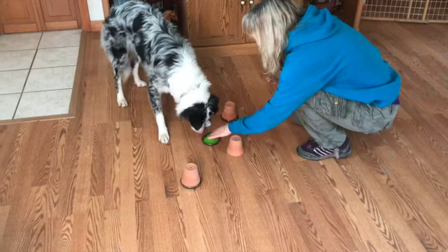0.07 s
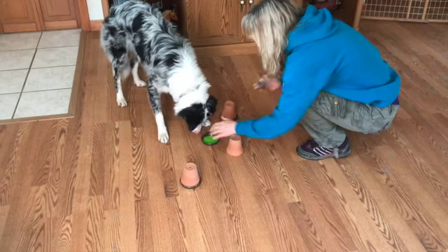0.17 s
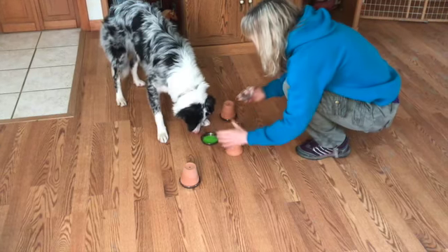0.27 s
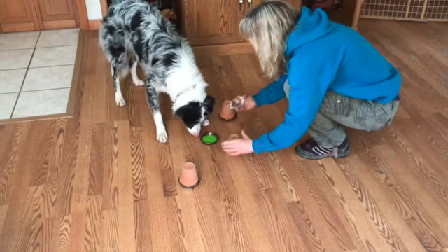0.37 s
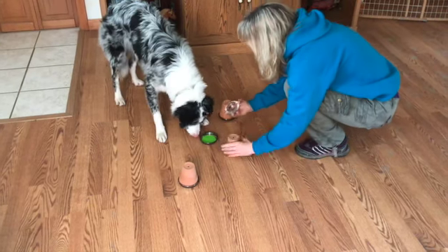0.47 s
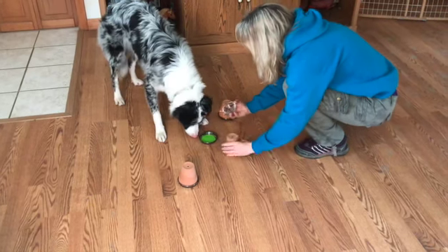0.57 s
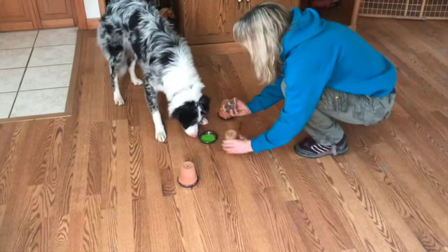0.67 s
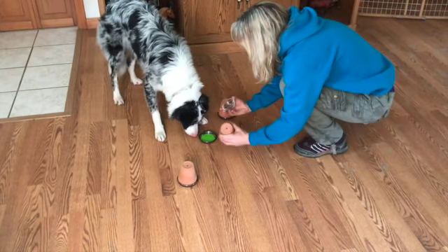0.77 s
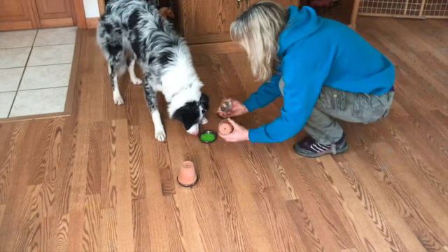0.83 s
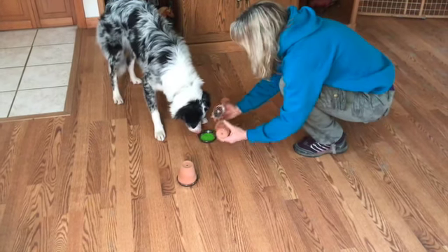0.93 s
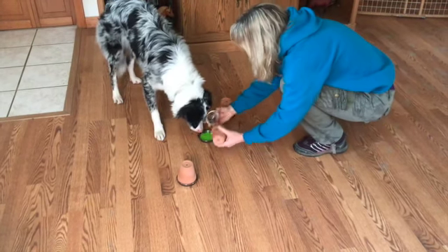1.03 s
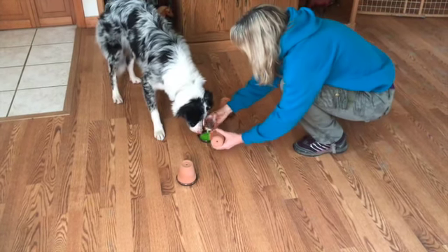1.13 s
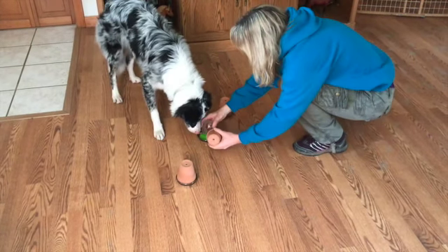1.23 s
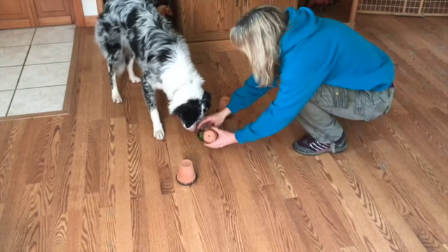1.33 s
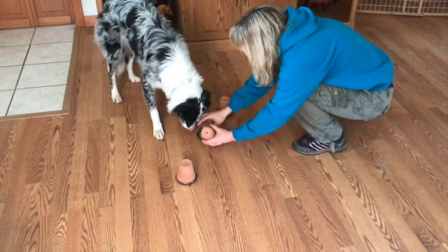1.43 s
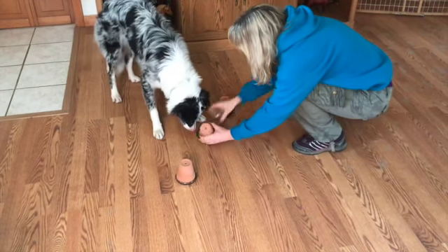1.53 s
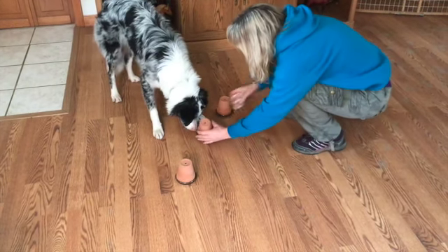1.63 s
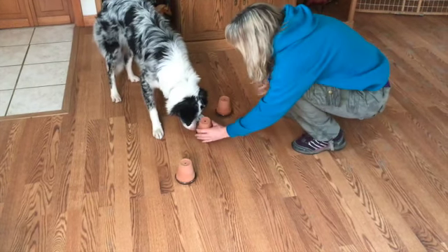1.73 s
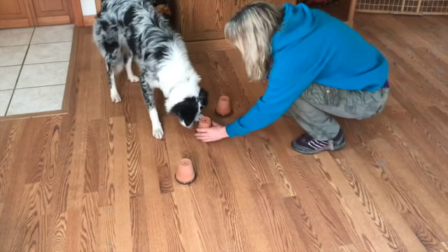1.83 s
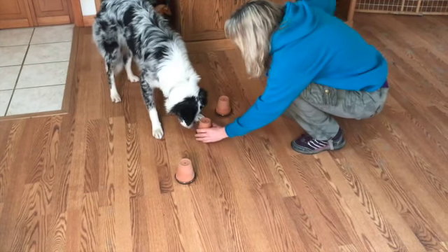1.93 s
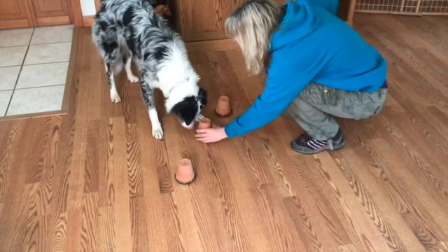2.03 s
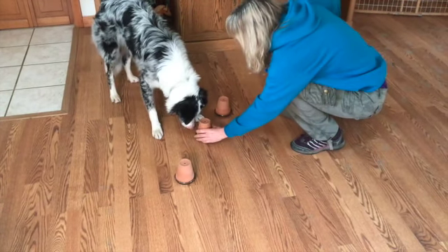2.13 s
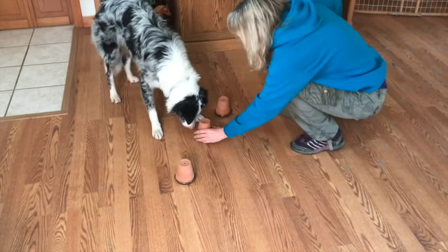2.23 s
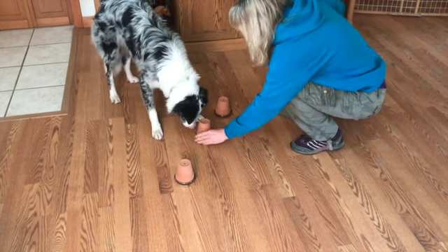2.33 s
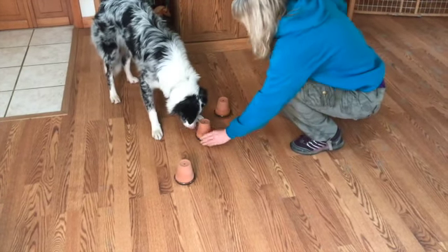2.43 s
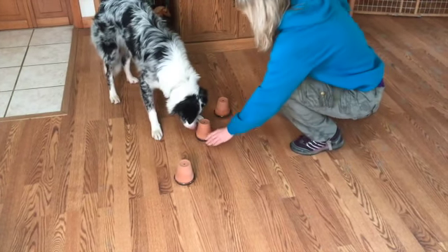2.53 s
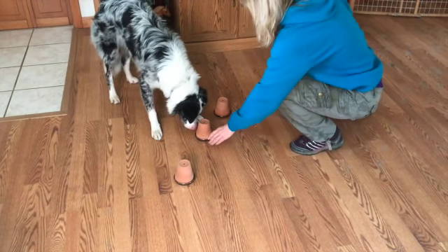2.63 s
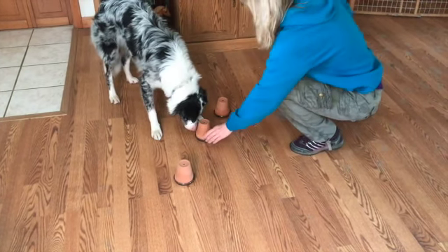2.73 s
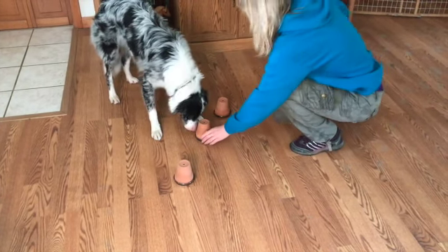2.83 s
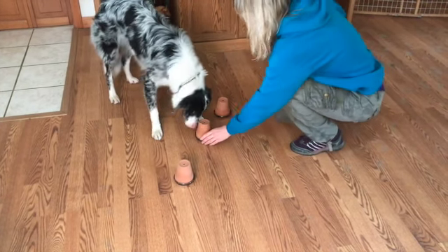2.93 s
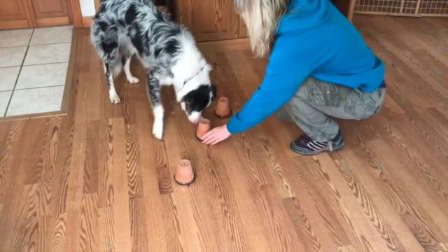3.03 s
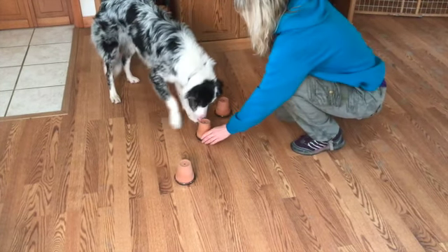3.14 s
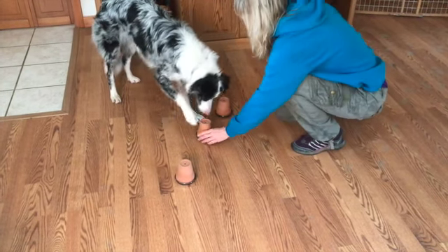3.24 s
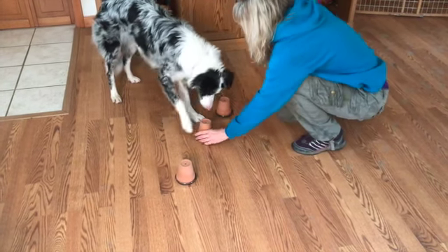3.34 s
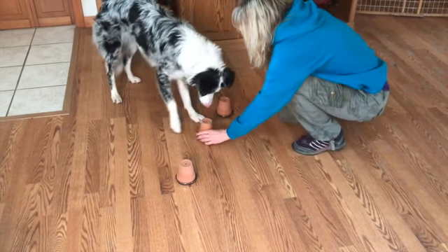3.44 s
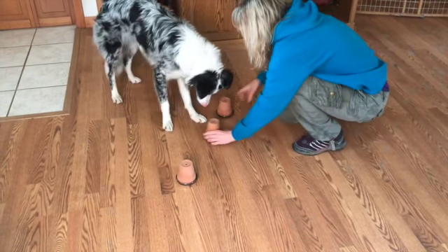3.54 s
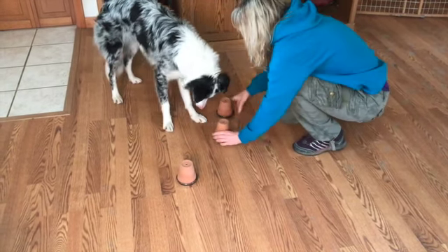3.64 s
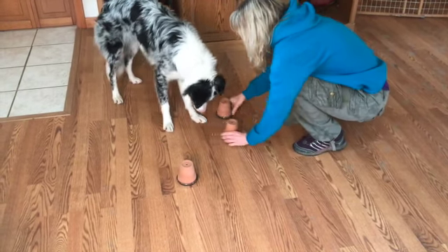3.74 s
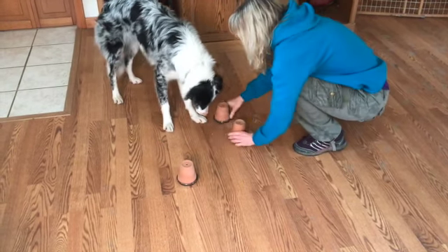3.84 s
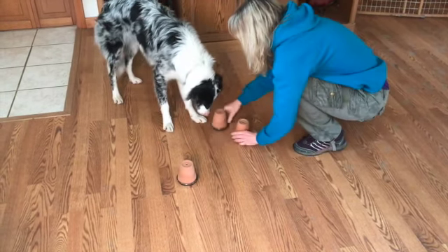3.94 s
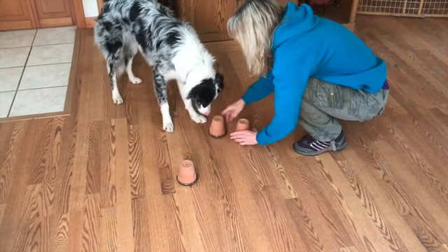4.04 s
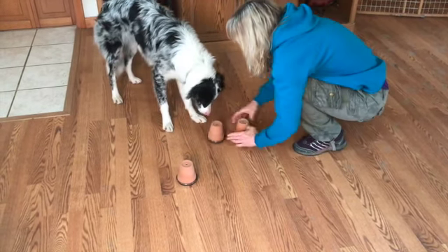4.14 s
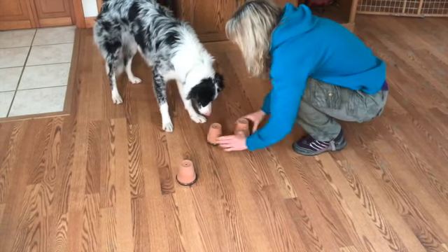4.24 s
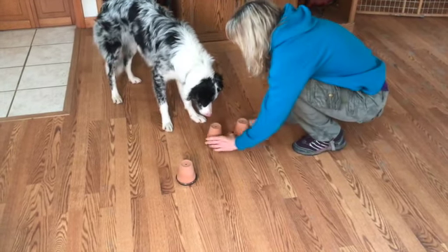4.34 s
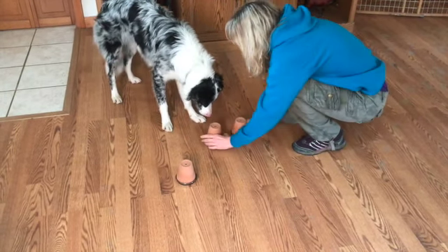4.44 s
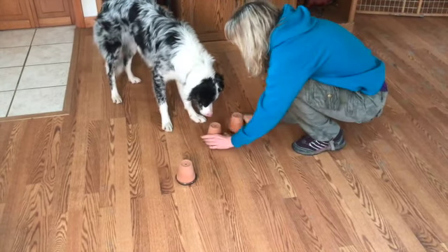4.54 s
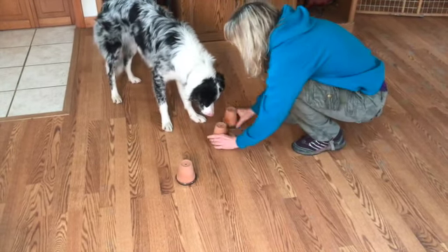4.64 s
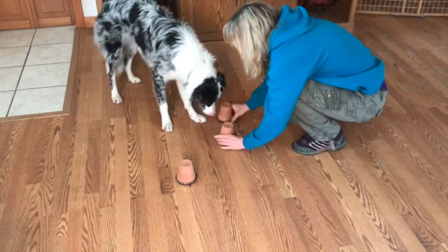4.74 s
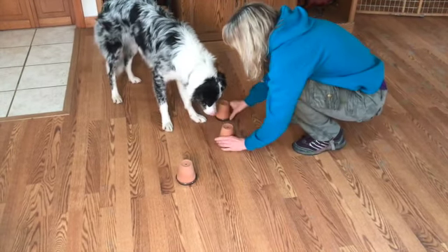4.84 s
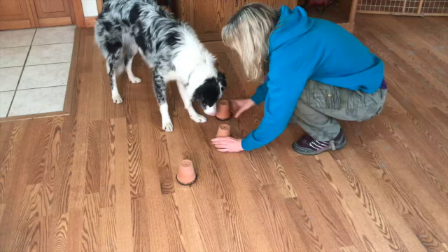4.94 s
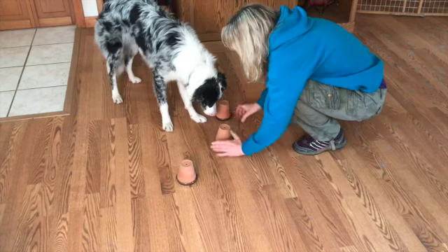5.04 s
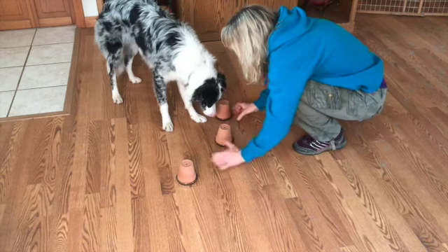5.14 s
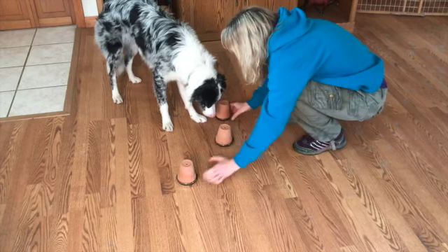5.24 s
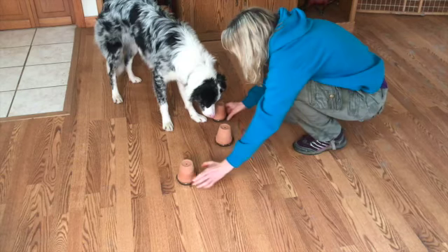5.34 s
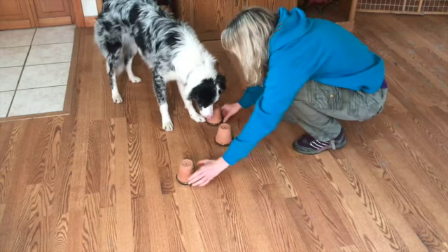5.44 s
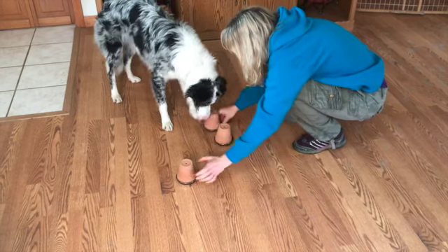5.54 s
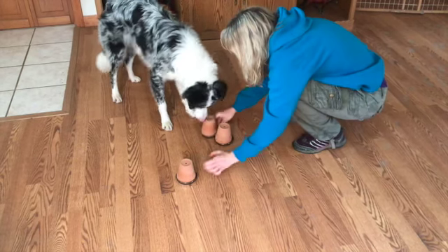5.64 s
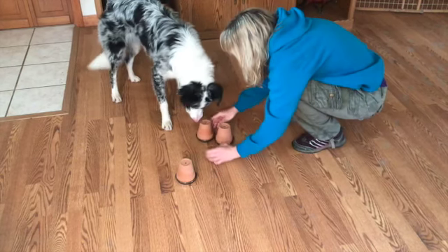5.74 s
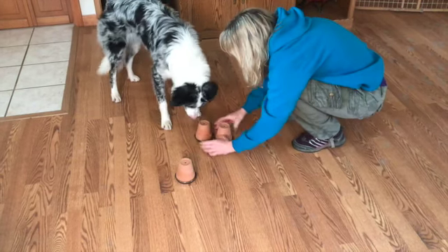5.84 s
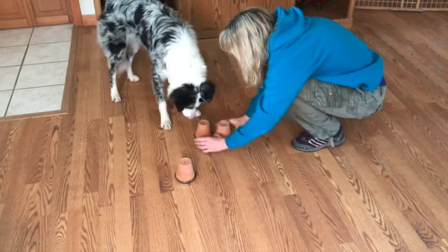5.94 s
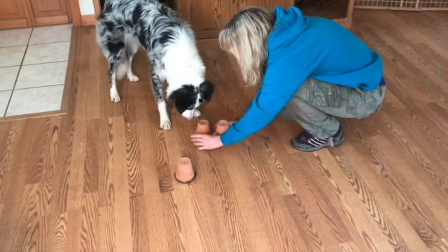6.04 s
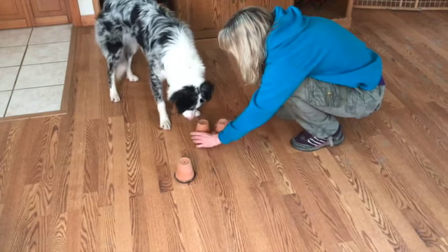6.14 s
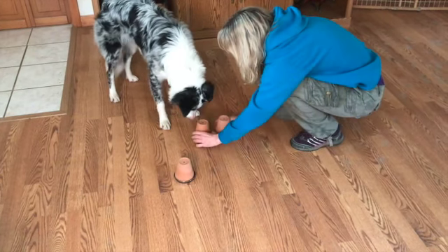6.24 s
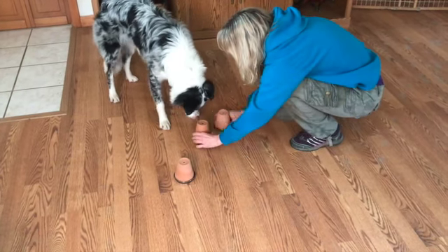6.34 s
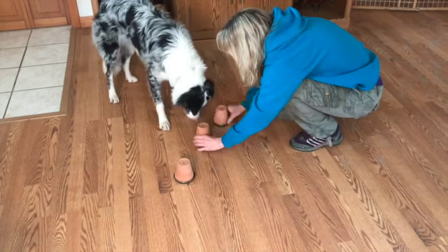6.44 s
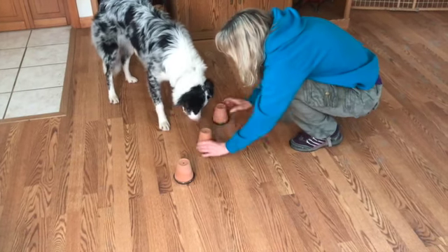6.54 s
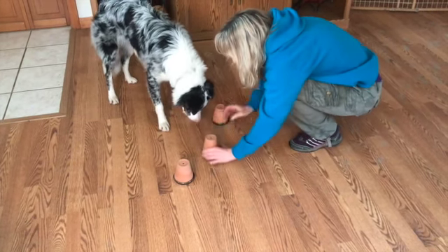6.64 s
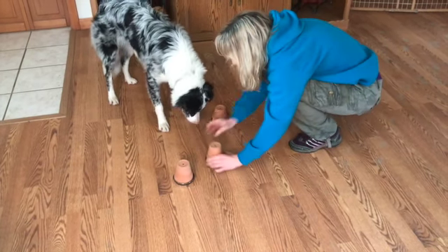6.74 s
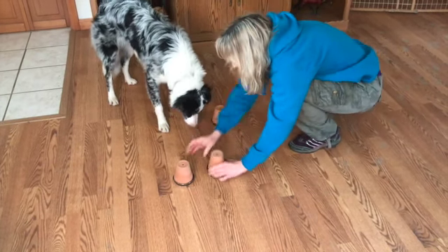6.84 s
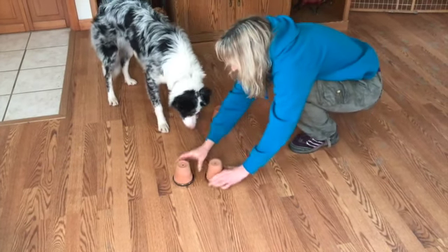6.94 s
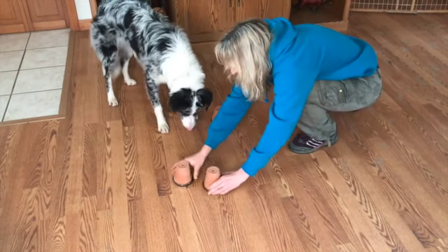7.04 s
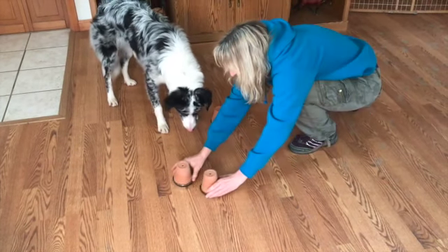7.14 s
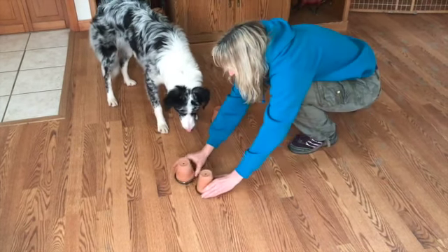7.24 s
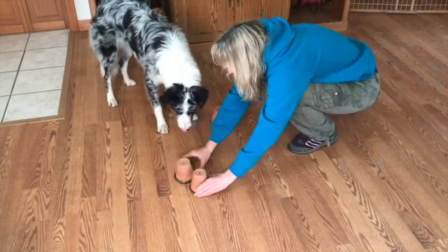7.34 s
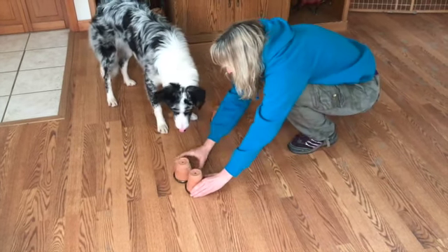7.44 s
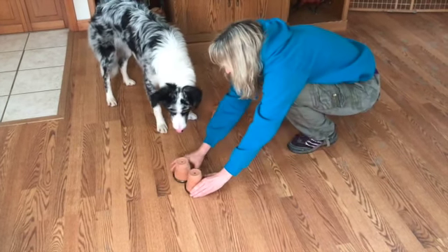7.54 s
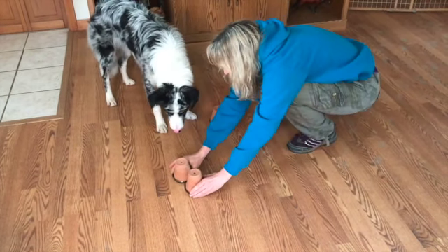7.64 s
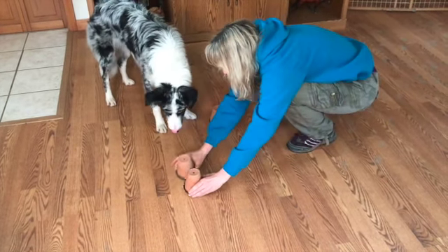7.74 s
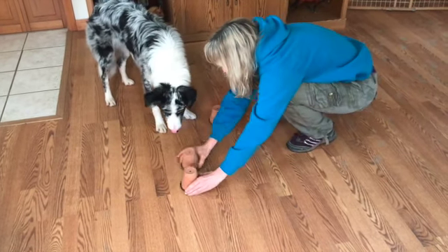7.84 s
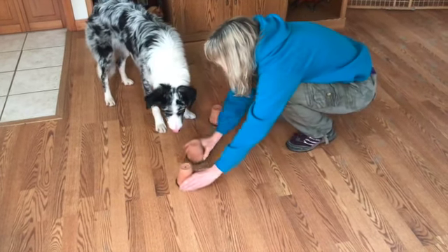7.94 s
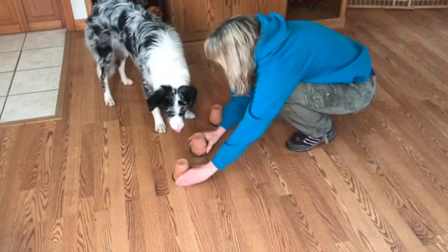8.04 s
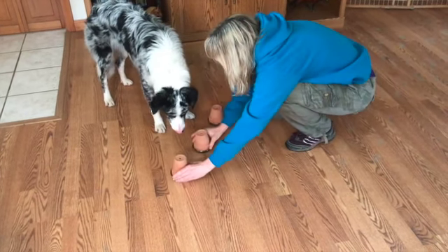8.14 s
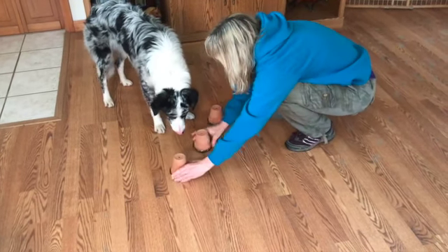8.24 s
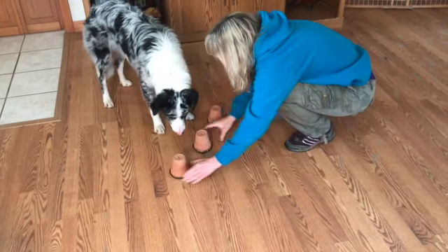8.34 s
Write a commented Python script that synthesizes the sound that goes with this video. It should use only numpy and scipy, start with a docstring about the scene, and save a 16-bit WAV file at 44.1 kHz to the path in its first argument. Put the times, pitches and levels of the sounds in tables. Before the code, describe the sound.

Quiet indoor air, a low blurred hum and a very thin high electrical whine continue throughout. Faint regular dry ticks run from 0.1 to 1.2 s, with scattered ones afterwards. Barely audible brushes and soft touches come at 0.6 and 1.2 s, then a firm, dull double knock of a clay pot on wooden boards near 2 s. After a lull, rough hollow scraping runs from 3.4 to 4.3 s, with a knock at 3.9, and another stroke from 4.4 to 5.0 with a knock at 4.7 and a soft, very low bump. A third scrape from 5.3 ends in a tight, ringing clatter at 5.7. A long gritty slide spans 6.1-7.2 s, with a small judder near 7. Hard clinking knocks at 7.4 and 7.65 punctuate shorter strokes; a last scrape with low judders fades around 8.3. Short room reverberation, moderately close microphone.

```python
"""Quiet room air, a blurred hum and a thin electrical whine last throughout; faint dry ticks begin the scene.
Upturned clay flower pots are then slid by hand on a wooden floor: rough slips drive boards, rims and clay.
Soon the pots also knock on the floor and clink together, exciting damped modes, and rims judder by stick-slip.
Midway there is one soft, very low bump. Early echoes and a diffuse tail answer slides, knocks and judders."""
import sys
import numpy as np
from scipy import signal
from scipy.fft import rfft, irfft, next_fast_len
from scipy.io import wavfile

SR = 44100
rng = np.random.default_rng(int(sys.argv[2]) if len(sys.argv) > 2 else 0)


def store_pcm(level_fs):
    """Save levels as 16-bit WAV."""
    pcm = np.round(np.clip(level_fs, -1, 1) * 32767).astype(np.int16)
    wavfile.write(sys.argv[1], SR, np.atleast_2d(pcm).T)


N = 369999
TIME = np.arange(N) / SR


def undb(db):
    """Decibel law: convert a level to an amplitude gain."""
    return 10 ** (np.asarray(db) / 20)


def level(x, db=0):
    """Mean-square law: scale a signal to an rms level."""
    return x * undb(db) / np.sqrt(np.mean(x ** 2))


def unit(response):
    """Energy normalisation: scale a response to unit energy."""
    return response / np.sqrt(np.sum(response ** 2))


def decay(t, t60):
    """Exponential decay: the amplitude falls by 60 dB in t60."""
    return np.exp(-np.log(1000) * t / t60)


def through(x, response):
    """Linear superposition: convolve a sound with an impulse response."""
    return signal.fftconvolve(x, response)[:len(x)]


def filtered(x, order, hz, kind="low"):
    """Butterworth filtering: maximally flat passband on one side of a corner frequency."""
    return signal.lfilter(*signal.butter(order, hz, kind, fs=SR), x)


def lookup(hz, points):
    """Linear interpolation of (f/Hz, value) points on a log-frequency axis."""
    at, values = np.transpose(points)
    return np.interp(np.log(np.maximum(hz, 1)), np.log(at), values)


def body(points, size=4096):
    """Minimum phase: a folded cepstrum turns (f/Hz, level/dB) points into a causal response."""
    log_gain = np.log(undb(lookup(np.fft.rfftfreq(size, 1 / SR), points)))
    cepstrum = irfft(log_gain)
    cepstrum[1:size // 2] *= 2
    cepstrum[size // 2 + 1:] = 0
    return unit(irfft(np.exp(rfft(cepstrum))))


def narrow(hz, width_hz, size=N):
    """Narrow-band noise: one steep resonance makes a wavering tone, of given width at half amplitude."""
    span = next_fast_len(max(size, 2 * SR))
    detune = 2 * (np.fft.rfftfreq(span, 1 / SR) - hz) / width_hz
    spectrum = rfft(rng.standard_normal(span)) / (1 + detune ** 2)
    return level(irfft(spectrum, span))[:size]


def walk(rate):
    """Slow random modulation: interpolated chance values, rate per second, with an rms of one."""
    return level(np.interp(TIME * rate, np.arange(4096), rng.standard_normal(4096)))


def add(track, at, sound):
    """Superposition: mix a sound into a track at a time."""
    start = int(at * SR)
    track[start:start + len(sound)] += sound[:N - start]


# colour of the room air: (f/Hz, relative density level/dB per Hz)
AIR_COLOUR = [(15, -48), (25, -10), (48, -10), (107, -2.5), (130, -7.5), (194, -7), (291, -9.5), (316, -13),
              (361, -10.5), (500, -20), (1250, -17.5), (2520, -29), (6310, -28.5), (10500, -40),
              (15800, -31)]
AIR_DB = -66.5  # rms level
# low hum tones, each with a blur around it: (f/Hz, width of the blur/Hz, level/dB)
HUM_TONES = [(59, 11, -71), (100.8, 11, -74), (204, 11, -77), (289, 16, -79)]
# thin electrical whine: (f/Hz, level/dB)
WHINE_TONES = [(6215, -84), (6380, -88.5)]


def background():
    """Stationary sources: spectrally shaped noise, blurred low tones and pure high tones."""
    air = through(rng.standard_normal(N), body(AIR_COLOUR, size=16384))
    sound = level(air * undb(.5 * walk(3.3)), AIR_DB)
    for hz, width, db in HUM_TONES:
        blurred = np.sin(2 * np.pi * hz * TIME) + 0.66 * narrow(hz, width)
        sound += undb(db) * blurred
    for hz, db in WHINE_TONES:
        sound += undb(db) * np.sin(2 * np.pi * hz * TIME)
    return sound


# a run of fainter, regular ticks: (first t/s, end t/s, period/s)
TICK_TRAIN = (.118, 1.2, .1025)
TICK_TRAIN_DB = -47.5  # mean level
# separate faint dry ticks: (t/s, level/dB)
SINGLE_TICKS = [(1.1116, -42.5), (1.5514, -44), (2.168, -46), (2.394, -42.5), (2.476, -42.5), (2.7827, -42),
                (3.0904, -43), (5.243, -42)]


def ticks():
    """Impulse excitation: very short coloured pulses, in a faint regular train and singly."""
    out = np.zeros(N)
    tick = body([(500, -16), (2000, -7), (3800, 2.0), (8000, -14.0), (15000, -20.0)], size=256)
    for at, db in SINGLE_TICKS:
        add(out, at, undb(db) * tick)
    for at in np.arange(*TICK_TRAIN):
        add(out, at, undb(TICK_TRAIN_DB + rng.standard_normal()) * tick)
    return out


# ridges of the wood grain: (rate relative to the main ridges, width relative to the main rate, level/dB)
GRAIN_RIDGES = [(.72, 0.095, -3.5), (0.998, 0.15, 2.5), (1.3, .15, -7)]
ARC_POWER = .7  # flattens the rise and fall of speed along the arc of the arm


def wood_grain(top_hz, size):
    """Spatial periodicity: a rim crossing ridges purrs at a rate that follows the sweep of the arm."""
    texture = level(sum(undb(db) * narrow(ratio * top_hz, width * top_hz, size=size)
                        for ratio, width, db in GRAIN_RIDGES))
    arm_speed = np.sin(np.pi * np.arange(size) / size) ** ARC_POWER
    travel = np.cumsum(arm_speed)
    return np.interp(travel, np.arange(size), texture)


# slides of a pot, from light brushes to long pushes: (start t/s, length/s, speed as it breaks loose 0-1,
# speeding up/s, slowing down/s, rasp of the boards at full speed: level/dB,
# their hollow rumble relative to it: level/dB, rim grit relative to it: level/dB,
# top rate of the wood ridges under the rim: f/Hz, their purr relative to the rasp: level/dB)
SLIDES = [(0.571, 0.081, .7, .02, 0.037, -68, 4.5, -5, 800, -8),
          (1.226, 0.09, 0.3, 0.065, 0.024, -55.5, -2, -9, 910, -7),
          (1.824, 0.068, .7, 0.029, 0.038, -65.5, 6.5, -4.5, 800, -12),
          (3.397, .11, 1, 0.019, 0.049, -50.5, -7.5, -14, 1940, -9.5),
          (3.461, 0.88, 0.55, 0.13, 0.23, -42, -4, -10.5, 1353, -9),
          (4.397, 0.65, 0.11, 0.19, 0.3, -41, -4.5, -11, 1260, -10),
          (5.29, 0.412, 0.35, 0.26, 0.039, -40.5, -6.5, -10.5, 1100, -10.5),
          (5.865, .17, 0.54, 0.074, 0.052, -50.5, -5, -10.5, 1180, -6.5),
          (6.114, 1.114, 0.25, 0.24, 0.19, -41, -7, -13, 1707, -7.5),
          (6.894, 0.32, 0.01, 0.13, 0.12, -57.5, -15, -28, 995, 8.5),
          (7.205, 0.27, 0.04, 0.053, 0.089, -41, -3, -10.5, 1084, -5.5),
          (7.544, 0.1, 0.3, 0.084, 0.033, -56, -10, -3, 900, 4),
          (7.696, 0.62, 0.18, 0.054, 0.12, -40, -3.5, -11, 1270, -14)]
BREAK_S = 0.012  # time that a pot takes to break loose
# loudness grows as a power of speed: the rumble lingers in a slow pot; rasp and grit fade sooner, almost alike
RASP_POWER, RUMBLE_POWER, GRIT_POWER = 1.32, 1.0, 1.26
PRESS_PER_S, PRESS_DB = 20, 0.5  # wavering pressure of the hand: changes per s, rms spread in dB


def strokes():
    """Friction kinematics: a pot breaks loose, speeds up and slows to rest; loudness is a power of speed."""
    rasp, rumble, grit, purr = tracks = np.zeros((4, N))
    for start, length, jump, rise, fall, db, rumble_db, grit_db, grain_hz, grain_db in SLIDES:
        t = np.arange(int(length * SR)) / SR
        push = np.minimum(t / BREAK_S, 1) * np.minimum(jump + (1 - jump) * t / rise, 1)
        speed = np.maximum(push * np.minimum((length - t) / fall, 1), 0)
        add(rasp, start, undb(db) * speed ** RASP_POWER)
        add(rumble, start, undb(db + rumble_db) * speed ** RUMBLE_POWER)
        add(grit, start, undb(db + grit_db) * speed ** GRIT_POWER)
        add(purr, start, undb(db + grain_db) * speed ** RASP_POWER * wood_grain(grain_hz, len(t)))
    return tracks * undb(PRESS_DB * walk(PRESS_PER_S))


# resonances of the floor and of the air under the pots: (f/Hz, width/Hz, level/dB)
HOLLOW_MODES = [(212, 13, -3), (245, 14, 3.5), (521, 24, -16), (675, 90, -5.5), (795, 14, -5.5),
                (1208, 17, -21.5), (1460, 95, -11)]


def hollow(x):
    """Resonance: the floor and the air under the pots lift a few narrow bands."""
    lifted = x.copy()
    for hz, width, db in HOLLOW_MODES:
        lifted += undb(db) * signal.lfilter(*signal.iirpeak(hz, hz / width, fs=SR), x)
    return lifted


# modes of the three clay pots, named for how they ring: {pot: (f/Hz, level/dB)}
POT_MODES = {"dull": [(1168, 1.5), (1260, 5), (1400, 5), (1545, -0.5), (3350, -7), (3650, -16),
             (4090, -5.5), (4550, -11), (4920, -11), (5200, -11), (5920, -11), (6130, -3), (6780, -17.5),
             (7600, -25)], "clear": [(1174, -7.5), (1529, 6), (1965, -5), (3262, -9), (3596, -6.5),
             (4075, 4), (4544, -6), (6002, -6), (6760, -6), (7600, -15), (9300, -15), (10100, -22),
             (12600, -21), (14600, -29.5)], "bright": [(1335, -5.5), (1570, 7.5), (3380, -9.5), (3612, -2),
             (3830, -4), (4054, 9), (4350, 2), (4540, -10.5), (5300, -7.5), (6200, -3), (6800, -6.5),
             (7650, -6.5), (9378, -14), (12310, -18.5), (13500, -22)]}
# ring time of the clay at 1 kHz, and the power of frequency by which it shortens
CLAY_T60_S, CLAY_FALL = 0.059, 0.38


def pot_ring(pot, scatter_db, size=8192):
    """Modal superposition: the point of contact weights damped modes, and high ones die first."""
    t = np.arange(size) / SR
    modes = POT_MODES[pot]
    signs = rng.choice([-1, 1], len(modes))
    weights = undb(scatter_db * rng.standard_normal(len(modes))) * signs
    ring = np.zeros(size)
    for weight, (hz, db) in zip(weights, modes):
        t60 = CLAY_T60_S * (1000 / hz) ** CLAY_FALL
        ring += weight * undb(db) * np.sin(2 * np.pi * hz * t) * decay(t, t60)
    return unit(ring)


def slips(per_s, spread_db):
    """Random impulse process: a rough rim makes many small slips and a few large ones."""
    size = undb(spread_db * np.minimum(rng.exponential(size=N), 6))
    happens = rng.random(N) < per_s / SR
    return level(happens * size * rng.standard_normal(N))


# response of the boards to a sliding rim: (f/Hz, level/dB)
BOARD_COLOUR = [(90, -36), (170, -17), (240, -13), (320, -9), (470, -4), (600, 0), (780, 0), (900, 0.5),
                (1100, 3), (1500, 1), (1950, -7), (2400, -20), (3200, -40), (6000, -52)]
# hiss of clay grit: (f/Hz, level/dB)
GRIT_COLOUR = [(1200, -30), (2300, -3), (2900, 2), (3400, 5.5), (4000, 4), (4450, 5.5), (5000, -3),
               (6000, -4), (7000, -11.5), (8500, -19.5), (10700, -82), (12400, -63), (15000, -30.5)]
# thin squeak of a dragged rim, with its level in the rim mix
SQUEAK_HZ, SQUEAK_WIDTH_HZ, SQUEAK_DB = 4190, 380, -10.5


def sliding():
    """Friction excitation: uneven slips shake the boards, hiss and squeak at the rim and ring the pots."""
    catch = level(undb(2.34 * walk(90)))  # the rim catches unevenly
    force = level(slips(per_s=1900, spread_db=1.0) * catch)

    wood = hollow(through(force, body(BOARD_COLOUR)))
    split = [signal.butter(5, 850, kind, fs=SR, output="sos") for kind in ("low", "high")]
    rumble, rasp = (signal.sosfilt(band, wood) for band in split)

    hiss = through(force, body(GRIT_COLOUR))
    squeak = catch * narrow(SQUEAK_HZ, SQUEAK_WIDTH_HZ) * undb(2.1 * walk(6))

    # each pot rings more or less freely as the grip on it changes; rubbing stirs mainly its lower modes
    rings = [pot_ring(pot, scatter_db=1.5) for pot in POT_MODES]
    clay = sum(through(force, ring) * undb(2.7 * walk(5.1)) for ring in rings)
    clay = filtered(clay, 2, 5500)
    rim = level(hiss, -1.5) + level(clay, -9.5) + level(squeak, SQUEAK_DB)

    rasp_gain, rumble_gain, grit_gain, purr = strokes()
    boards = rasp_gain * level(rasp, -0.17) + rumble_gain * level(rumble, -1.37)
    return boards + grit_gain * rim + catch * purr


# response of the boards to a blow: (f/Hz, level/dB)
THUD_COLOUR = [(30, -57.5), (220, -13), (430, -13), (560, -4.5), (850, -3), (1200, 0), (1550, -4.5),
               (1900, -11), (2550, -23.5), (3700, -8.5), (5200, -15), (6500, -25.5), (9000, -34),
               (15000, -43)]


def board_thud(ring_db, ring_t60_s, size=4096):
    """Impact response: a blow on the boards, then the brief ring of their many modes as decaying noise."""
    ring = rng.standard_normal(size) * decay(np.arange(size) / SR, ring_t60_s)
    response = undb(ring_db) * unit(ring)
    response[0] += 1
    return unit(through(response, body(THUD_COLOUR)))


# colour of the chattering rim: (f/Hz, level/dB)
CRACK_COLOUR = [(500, -8), (1400, -1), (2600, -15), (3500, 2.5), (4400, 1.5), (5200, -8.5), (6500, -2),
                (8200, -18.5), (11000, -28.5), (13000, -19), (15500, -25)]
CRACK_T60_S = 0.026


def crack(size=8192):
    """Micro-impacts: a hard clay rim chatters as it lands, heard as decaying noise."""
    chatter = rng.standard_normal(size) * decay(np.arange(size) / SR, CRACK_T60_S)
    return unit(through(chatter, body(CRACK_COLOUR)))


# knocks: (t/s, thud of the boards: level/dB, ring of the clay: level/dB, contact hardness as upper corner: f/Hz,
# lower corner of the thud: f/Hz, which pot)
BLOWS = [(.582, -31, -50, 907, 400, "dull"), (.6275, -26, -36, 1100, 400, "dull"),
         (1.240, -31, -45, 2000, 400, "dull"), (1.899, -23.5, -52, 744, 300, "dull"),
         (1.9790, -8.5, -6.5, 1990, 450, "dull"), (2.0377, -5.5, -10, 1470, 700, "dull"),
         (2.2, -26, -31, 1300, 900, "dull"), (2.231, -33, -25.5, 1300, 900, "dull"),
         (3.909, -13.5, -17, 5000, 500, "bright"), (4.660, -8.5, -14, 3000, 400, "bright"),
         (5.307, -40, -23.5, 6000, 500, "clear"), (5.607, -33, -15, 5000, 400, "clear"),
         (5.6990, -2, -2.5, 3400, 299.3, "clear"), (5.7106, -3.5, -6.5, 3500, 404, "clear"),
         (5.717, -10, -1, 5500, 400, "clear"), (5.738, -3, -9, 1700, 400, "clear"),
         (5.797, -15, -13.5, 2500, 300, "clear"), (6.119, -27, -34, 5000, 600, "bright"),
         (6.143, -18, -25, 2200, 500, "dull"), (6.199, -9, -35, 890, 306, "dull"),
         (6.566, -32, -11.5, 4900, 600, "bright"), (6.618, -26, -13, 5000, 604, "bright"),
         (6.96, -24, -19, 5000, 600, "bright"), (7.4385, -1, -1.5, 7100, 401, "bright"),
         (7.6129, -16.5, -22, 2200, 500, "bright"), (7.6400, 1, -2.5, 1950, 402, "bright"),
         (7.6684, -12, -1, 1400, 507, "clear"), (7.683, -20, -16, 1510, 500, "clear"),
         (7.896, -28, -10.5, 5500, 900, "clear")]
CRACK_DB = -10  # relative to the modes of the clay


def knocks():
    """Contact stiffness: blows thud in the boards and ring the clay; soft contact takes the treble away."""
    out = np.zeros(N)
    for at, thud_db, ring_db, hard_hz, low_hz, pot in BLOWS:
        edge_hz = min(hard_hz, SR / 2 - 1000)
        thud = filtered(board_thud(ring_db=1.5, ring_t60_s=0.018), 2, edge_hz)
        thud = filtered(thud, 1, low_hz, "high")  # each knock has its own lower corner, which thins its bass
        clay = pot_ring(pot, scatter_db=0.2) + undb(CRACK_DB) * crack()
        clay = filtered(clay, 1, edge_hz)  # the hard clay keeps more treble than the wood
        clay = filtered(clay, 1, low_hz / 2, "high")  # the clay's ring is thinned below half the knock's lower corner
        add(out, at, undb(thud_db) * thud)
        add(out, at, undb(ring_db) * clay)
    return out


# rim judders and squeaks: (centre t/s, time from centre to exp(-2) of the peak/s, f/Hz, level/dB)
RIM_JUDDERS = [(0.584, 0.0091, 738, -56.5), (0.625, 0.013, 820, -58), (3.7, 0.029, 780, -49),
               (4.093, 0.035, 813, -41), (4.22, 0.094, 805, -48.5), (4.547, 0.11, 783, -47.5),
               (4.647, 0.053, 4190, -50), (4.83, 0.13, 806, -51), (4.903, 0.097, 4130, -59),
               (5.367, 0.077, 4160, -59.5), (6.193, .015, 780, -48), (7.043, 0.028, 940, -37),
               (7.767, 0.027, 530, -40.5), (8.007, 0.02, 540, -34.5), (8.06, 0.034, 526, -54)]


def judders():
    """Stick-slip oscillation: a rim briefly sticks and slips at a nearly steady rate."""
    out = np.zeros(N)
    for at, length, hz, db in RIM_JUDDERS:
        swell = np.exp(-2 * ((TIME - at) / length) ** 2)
        out += undb(db) * swell * narrow(hz, width_hz=70)
    return out


# a soft, very low bump: (centre t/s, f/Hz, time from centre to 1/e of the peak/s, level/dB)
LOW_BUMP = (4.465, 48, .016, -53)


def bump(at, hz, length, db):
    """Gaussian wave packet: one soft, very low bump."""
    swell = np.exp(-((TIME - at) / length) ** 2)
    return undb(db) * swell * np.sin(2 * np.pi * hz * (TIME - at))


# reverberation time of the room: (f/Hz, t60/s)
TAIL_T60 = [(200, 0.94), (550, 0.34), (1400, 0.46), (4000, 0.38), (10000, 0.39)]


def room_tail(build_s, size=32768):
    """Diffuse reverberation: dense echoes from one spot build up, then decay at a rate set by frequency."""
    hz, t, cells = signal.stft(rng.standard_normal(size), SR, nperseg=256)
    fade = decay(t, lookup(hz, TAIL_T60)[:, None])
    tail = signal.istft(cells * fade, SR)[1][:size]
    return unit(tail * (1 - np.exp(-np.arange(size) / SR / build_s)))


# early echoes from cabinets and walls: (delay/s, gain relative to the direct sound)
EARLY_ECHOES = [(.0053, 0.081), (0.0105, 0.2), (0.0103, .2), (.029, 0.23)]


def room(x, tail_db, spots_per_s, count=5):
    """Room response: direct sound, early echoes and tails cross-faded from spot to spot as if the pots moved."""
    out = x.copy()
    for delay, gain in EARLY_ECHOES:
        add(out, delay, gain * x)
    for spot in range(count):
        away = np.abs((TIME * spots_per_s - spot) % count - count / 2)
        share = np.cos(np.pi / 2 * np.minimum(away, 1))
        out += undb(tail_db) * through(x * share, room_tail(build_s=0.0049))
    return out * undb(-2.0)


def scene():
    """Superposition: the pots in the room, with ticks, bump and background added directly."""
    pots = room(sliding() + knocks() + judders(), tail_db=1.5, spots_per_s=8, count=11)
    return (background() + ticks() + pots + bump(*LOW_BUMP))[None]


def record(dry):
    """Band limiting: a steep elliptic low-pass removes the top of the treble."""
    return signal.sosfilt(signal.ellip(10, .2, 70, 15850, fs=SR, output="sos"), dry)


dry = scene()
out = record(dry)
store_pcm(out)
```